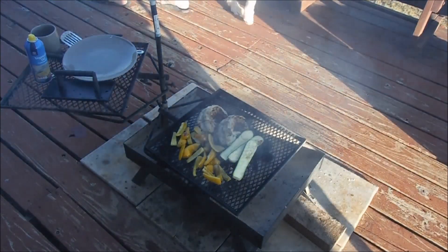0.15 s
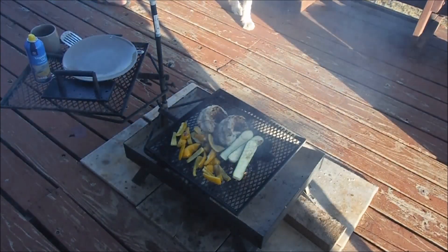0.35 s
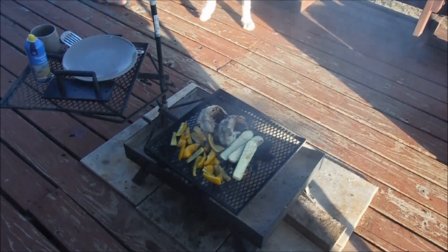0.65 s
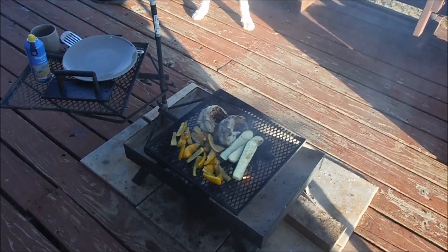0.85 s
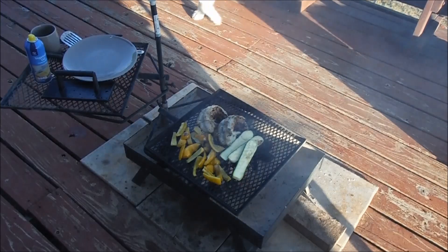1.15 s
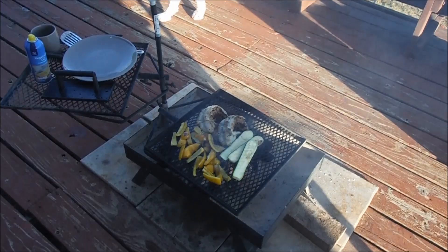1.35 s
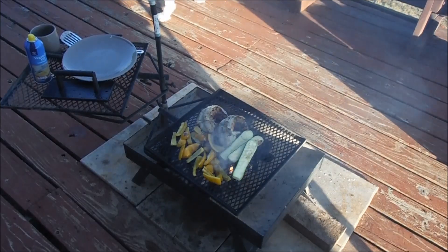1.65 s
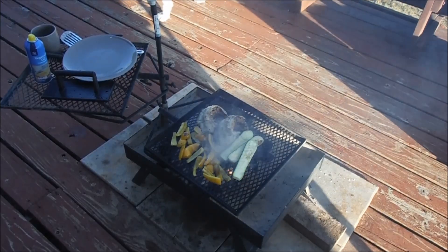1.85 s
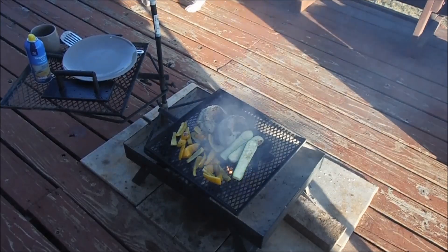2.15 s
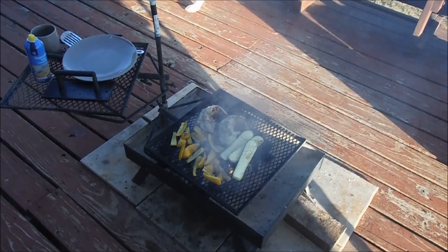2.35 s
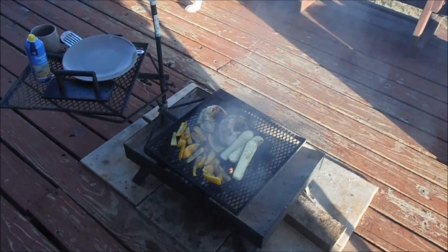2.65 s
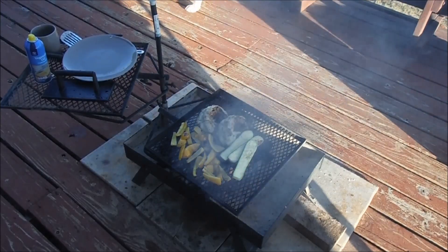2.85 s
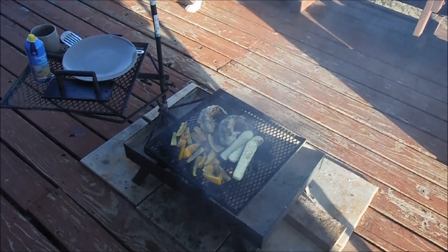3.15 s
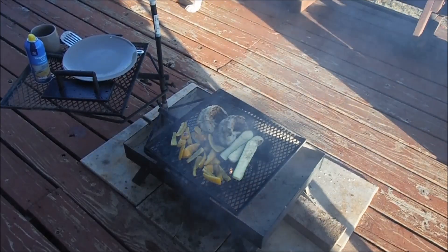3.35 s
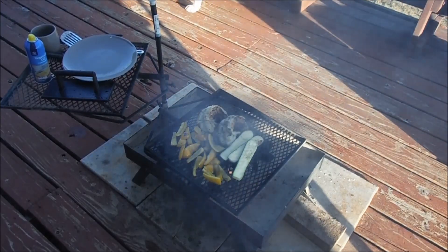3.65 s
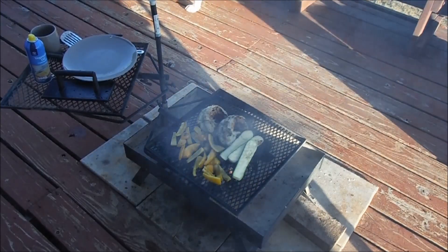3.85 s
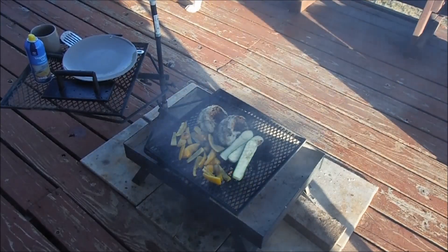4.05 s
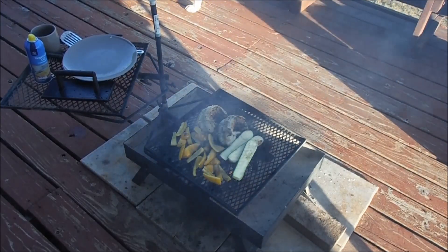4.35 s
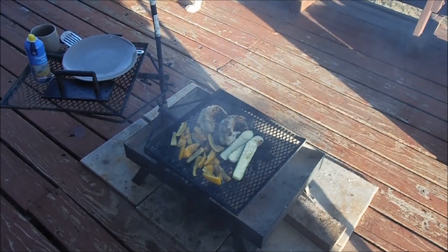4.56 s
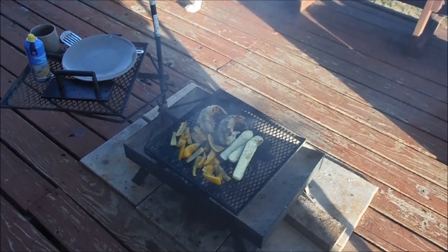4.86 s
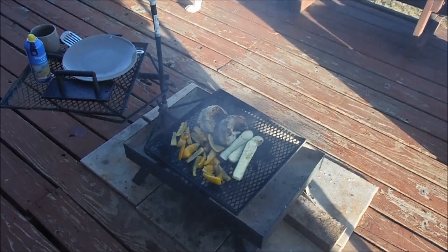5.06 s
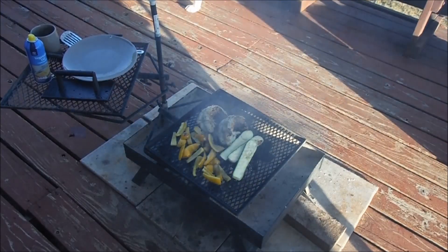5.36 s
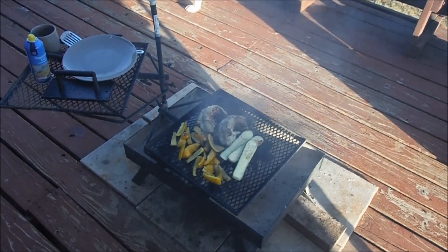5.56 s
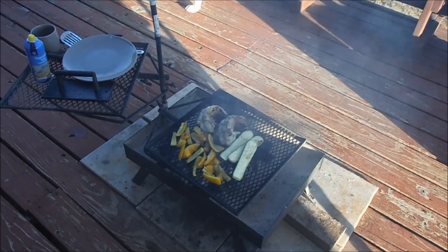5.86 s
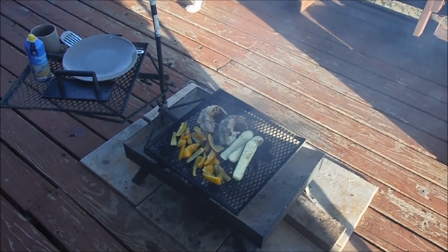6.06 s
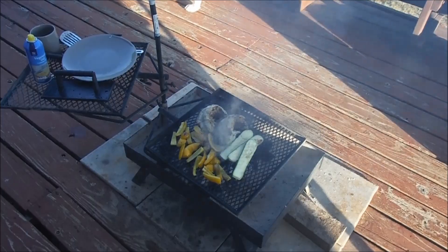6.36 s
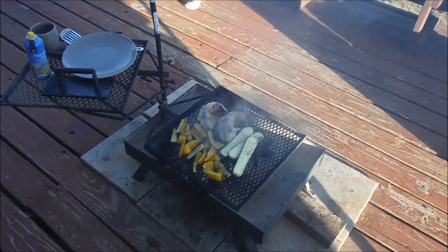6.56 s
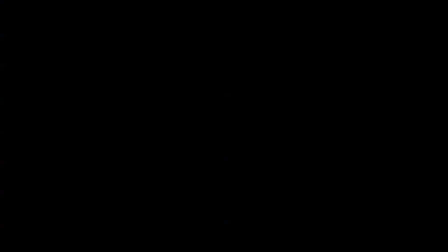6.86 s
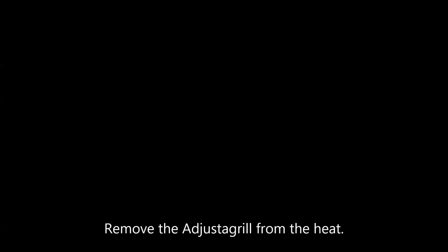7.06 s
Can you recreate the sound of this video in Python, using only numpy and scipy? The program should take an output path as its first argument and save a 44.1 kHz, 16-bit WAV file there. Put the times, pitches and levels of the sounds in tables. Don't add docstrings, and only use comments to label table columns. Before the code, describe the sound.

Outdoors on a wooden deck, food sizzles close to the microphone from 0 seconds: a bright, fine, flickering hiss of bursting steam bubbles, over faint low mains hum, soft open air and far rumble. Crisp fat spits pepper it, dense in the first half second, with clear pops near 1.0 and 3.35. Dog claws tick lightly around 0.8-1.0; paws scuff softly, busier at 2.2-2.6, and a quick, harder step lands at 2.9-3.0. The frying swells slightly around 1.2-1.5, dips near 2.5 and weakens by 5.4. At 5.8 a small click begins the handling; a sharp grab cracks at 5.9, followed by finger rubs. Deep grip rumble swells at 6.3, the hardest distorted crack hits at 6.43, and another heavy jolt comes at 6.58. The sizzle drops lower beneath. A loose part taps softly at 6.6-6.77, then everything stops dead at 6.9.

```python
import sys
import numpy as np
from scipy import signal
from scipy.fft import rfft, irfft, next_fast_len
from scipy.io import wavfile
from scipy.ndimage import uniform_filter1d

SR = 44100
rng = np.random.default_rng(int(sys.argv[2]) if len(sys.argv) > 2 else 0)


def ratio_of_db(decibels):
    return 10 ** (np.asarray(decibels, float) / 20)


def wav_out(sig):
    wavfile.write(sys.argv[1], SR, np.round(np.clip(np.atleast_2d(sig).T, -1, 1) * 32767).astype(np.int16))


N = 318402
T = np.arange(N) / SR


def band(x, hz, width):
    low = max(np.sqrt(hz ** 2 + width ** 2 / 4) - width / 2, 10)
    high = min(low + width, 0.45 * SR)
    return signal.sosfilt(signal.butter(2, [low, high], "bandpass", fs=SR, output="sos"), x)


def unit(x):
    return x / np.sqrt(np.mean(x ** 2))


def walk(rate):
    hold = int(SR / rate)
    levels = np.repeat(rng.standard_normal(N // hold + 1), hold)
    return unit(uniform_filter1d(uniform_filter1d(levels, hold), hold)[:N])


def add(out, s, x):
    i = int(s * SR)
    out[i:i + len(x)] += x[:N - i]


def decay(t, t60):
    return 1000 ** (-t / t60)


def bed(source, colour, lo, hi, flicker_db, rate):
    size = next_fast_len(N)
    f = np.maximum(np.fft.rfftfreq(size, 1 / SR), 1)
    hz, db = np.transpose(colour)
    tinted = rfft(source, size) * ratio_of_db(np.interp(np.log(f), np.log(hz), db))
    inside = (f > lo) & (f < hi)
    tinted /= np.sqrt(np.mean(irfft(tinted * inside, size) ** 2))
    thirds = 3 * np.log2(f)
    first, last = int(3 * np.log2(hz[0])) - 1, int(3 * np.log2(hz[-1])) + 1
    out = np.zeros(N)
    for k in range(first, last + 1):
        share = np.cos(np.pi / 2 * np.clip(thirds - k, -1, 1)) ** 2
        out += irfft(tinted * share, size)[:N] * ratio_of_db(flicker_db * walk(rate))
    return out


def hits(table, spread, low_hz, low_width, low_stretch, tick):
    out, t = np.zeros(N), T[:SR // 6]
    for s, db, hz, low_db, t60 in table:
        high, low = rng.standard_normal((2, len(t)))
        t60 = max(t60, 0.002)
        high *= decay(t, t60)
        low *= decay(t, t60 * low_stretch)
        high[0], low[0] = tick, tick
        high = band(high, hz, spread * hz)
        low = band(low, low_hz, low_width)
        add(out, s, ratio_of_db(db) * (high / abs(high).max() + ratio_of_db(low_db) * low / abs(low).max()))
    return out


def strokes(table):
    out = np.zeros(N)
    grit_db = 2.5
    for s, length, db, hz, width in table:
        u = np.arange(int(length * SR)) / (length * SR)
        noise, grit = rng.standard_normal((2, SR // 2))
        grit = ratio_of_db(grit_db * unit(uniform_filter1d(grit, size=90)))
        x = unit(band(noise * grit, hz, width))[:len(u)]
        swell, fade = np.minimum(u / 0.1, 1), np.minimum((1 - u) / 0.49, 1)
        add(out, s, ratio_of_db(db) * x * swell * fade)
    return out


# (time [s], sizzle level [dB])
FRYING_HEAT = [(0.0, -51.5), (0.57, -53), (0.98, -51.5), (1.18, -49.5), (1.49, -49.5), (2.48, -55),
               (2.59, -55), (4.11, -53), (5.4, -57.5), (5.64, -56), (5.75, -54)]


def heat():
    return np.interp(T, *np.transpose(FRYING_HEAT))


# (frequency [Hz], density [dB per Hz])
AIR_COLOUR = [(12, -22), (20, 2.5), (75, -0.5), (118, -4.5), (139, -3.5), (168, -3.5), (412, -11),
              (947, -15), (1250, -13), (1610, -19), (2080, -16.5), (2740, -23.5), (3880, -25.5),
              (4350, -27.5), (5000, -20), (6500, -29.5), (11000, -120)]


def air():
    air_db, follows_heat = -58.5, 0.22
    level = air_db + follows_heat * (heat() - heat().mean())
    return bed(rng.standard_normal(N), AIR_COLOUR, 300, 2500, 1.5, 2.5) * ratio_of_db(level)


# (frequency [Hz], level [dB])
MAINS = [(60, -67), (120, -56)]


def hum():
    seconds = np.cumsum(1 + 0.0025 * walk(4)) / SR
    out, wobble_db = np.zeros(N), 1.0
    for hz, db in MAINS:
        out += np.sqrt(2) * ratio_of_db(db + wobble_db * walk(8.9)) * np.sin(2 * np.pi * hz * seconds)
    return out


# (time [s], peak level [dB], centre [Hz], board thud level [dB], t60 [s])
CLAW_TAPS = [
    (0.77, -50.5, 2270, -9, .05),
    (1.036, -42, 3500, -9, 0.0054),
    (2.43, -44, 2260, -17, 0.034),
    (2.431, -43, 1050, -20, 0.069),
    (2.58, -59, 520, 7.5, 0.062),
    (2.65, -48.5, 1330, 0.5, .05),
    (2.911, -43.5, 1650, -3, 0.11),
    (2.964, -33, 1740, -8, 0.093),
    (6.507, -41.5, 1700, 5.5, 0.0051),
    (6.5175, -54, 1200, -3.5, 0.0047),
]


def claws():
    return hits(CLAW_TAPS, 0.66, 283, 500, 2.37, 2.4) * ratio_of_db(7.5)


# (time [s], length [s], level [dB], centre [Hz], width [Hz])
PAW_SCUFFS = [(1.014, 0.12, -47, 7500, 4500), (1.252, 0.28, -59.5, 3000, 3000),
              (1.594, 0.17, -54, 2080, 1490), (1.602, 0.15, -51.5, 5630, 3500),
              (2.023, 0.12, -56.5, 2500, 4000), (2.231, 0.073, -44, 1080, 1296),
              (2.242, 0.089, -50, 447, 440), (2.245, 0.089, -44.5, 4500, 7000),
              (2.25, 0.034, -40, 2250, 2190), (2.28, 0.072, -47.5, 1990, 3000),
              (2.294, 0.036, -42.5, 1210, 700), (2.433, 0.023, -54, 8500, 1500),
              (2.914, 0.015, -45.5, 7500, 6000), (2.961, 0.016, -37.5, 6700, 7800),
              (2.966, 0.031, -43.5, 5000, 5600), (4.898, 0.26, -63, 3630, 2000),
              (5.559, 0.27, -65, 3750, 1111), (3.9, 0.38, -59, 13000, 5000),
              (5.575, 0.18, -59, 12500, 6000)]


def scuffs():
    return strokes(PAW_SCUFFS)


# (time [s], length [s], level [dB], centre [Hz])
FINGER_RUBS = [(5.802, 0.078, -51.5, 3000), (5.916, 0.089, -42.5, 4910), (5.976, 0.068, -39, 5200),
               (5.98, .05, -47, 1800), (6.001, 0.043, -52, 350), (6.026, 0.027, -43.5, 1290),
               (6.03, 0.15, -45.5, 4500), (6.086, 0.028, -47, 1150), (6.095, 0.024, -48, 7800),
               (6.176, 0.048, -47, 2980), (6.203, 0.019, -39, 3300), (6.2, 0.02, -46, 1150),
               (6.248, 0.012, -50, 3000), (6.258, 0.078, -44.5, 394), (6.272, 0.16, -56, 992),
               (6.317, 0.087, -43.5, 446), (6.445, 0.049, -30.5, 7030), (6.449, 0.053, -47, 13120),
               (6.45, 0.053, -36, 3000), (6.46, 0.033, -28, 700), (6.465, 0.01, -31.5, 2530),
               (6.551, 0.026, -56.5, 6030), (6.554, 0.056, -44, 394), (6.59, 0.033, -28, 807),
               (6.593, 0.016, -44.5, 2454), (6.599, 0.029, -29.5, 3950), (6.603, 0.027, -53, 9970),
               (6.608, 0.029, -43.5, 3015)]


def rubs():
    widest_hz = 4500
    return strokes([(*row, min(1.6 * row[-1], widest_hz)) for row in FINGER_RUBS])


# (time [s], level [dB])
GRIP_RUMBLE = [
    (5.88, -64),
    (5.93, -43),
    (6.04, -40),
    (6.1, -45.5),
    (6.23, -38.5),
    (6.34, -21.5),
    (6.405, -33),
    (6.49, -23.5),
    (6.536, -54),
]
# (time [s], level [dB])
REGRIP_RUMBLE = [
    (6.57, -24),
    (6.601, -27),
    (6.619, -39),
]


def grip():
    s, db = np.transpose([*GRIP_RUMBLE, *REGRIP_RUMBLE])
    rumble = band(rng.standard_normal(N), 32, 200)
    rumble = unit(signal.lfilter([1], [1, -0.985], rumble))
    return rumble * ratio_of_db(np.interp(T, s, db, -120, -120) + 3.8 * walk(60))


# (time [s], push [full scale, negative = pull], half width [s], rebound [full scale])
MEMBRANE_JOLTS = [(5.8105, -.04, .001, .01), (5.91615, -2.0, .0003, 0), (5.9167, -.5, .0004, .27),
                  (6.032, -.04, .003, .02), (6.333, .2, .003, -.15), (6.382, .13, .008, 0),
                  (6.409, .22, .0008, -.1), (6.4279, 1.05, .0009, -.5), (6.4492, .25, .001, -.08),
                  (6.4663, -.85, .0006, .12), (6.5535, -.13, .001, .1), (6.575, .33, .008, 0),
                  (6.5838, -1.8, .001, .6), (6.599, -.3, .005, 0), (6.6025, .2, .0006, 0),
                  (6.6065, -.7, .004, -.4), (6.6192, .42, .0007, 0)]


def jolts():
    out, settle_s = np.zeros(N), 0.007
    for s, push, half, rebound in MEMBRANE_JOLTS:
        after = np.maximum(T - s - half / 2, 0)
        out += push * np.exp(-((T - s) / half) ** 2)
        out += rebound * (1 - np.exp(-(after / half) ** 2)) * np.exp(-after / settle_s)
    return out


# (time [s], peak level [dB])
LOOSE_TAPS = [
    (6.624, -30),
    (6.695, -39.5),
    (6.766, -46),
]
# (frequency [Hz], level [dB], t60 [s])
CASING_MODES = [(461, 3, 0.072), (716, 4.5, 0.037), (1020, -18, 0.091), (1223, -7, 0.05)]


def rattles():
    out, t = np.zeros(N), T[:SR // 4]
    for s, db in LOOSE_TAPS:
        ring = np.zeros(len(t))
        for hz, mode_db, t60 in CASING_MODES:
            level = ratio_of_db(mode_db + 2.0 * rng.standard_normal())
            ring += level * np.sin(2 * np.pi * hz * t) * decay(t, t60)
        add(out, s, ratio_of_db(db) * ring * np.minimum(t / 0.01, 1))
    return out


# (time [s], peak level [dB], centre [Hz], low part level [dB], t60 [s])
BUTTON_TICKS = [(5.81, -32, 8000, -21, 0.0066), (5.9045, -15.5, 7900, -14, 0.0064),
                (5.9065, -23, 7500, -20, .005), (5.908, -35, 8500, -18, .005),
                (5.9105, -27, 6400, -12, 0.0084), (5.937, -36, 6000, -20, .006),
                (6.349, -29, 5800, -4, .006), (6.033, -36, 4000, -2, 0.0069),
                (6.553, -43, 7300, -0.5, 0.0068), (6.57, -40, 4280, -9.5, .005),
                (6.585, -13, 3000, -28, 0.011)]


def ticks():
    return hits(BUTTON_TICKS, 0.3, 2600, 2500, 2.1, 6.7)


# (time [s], peak level [dB], centre [Hz], low part level [dB], t60 [s])
CASING_CRACKS = [
    (5.9157, -9, 5000, -6, .006),
    (6.4085, -14, 6500, -8, .007),
    (6.427, -14, 5000, -8, .008),
    (6.4284, -5, 6000, -9, .009),
    (6.4485, -15, 8000, -4, .007),
    (6.5836, -15, 5000, -6, .006),
    (6.6158, -16, 5000, -8, .014),
]


def cracks():
    return hits(CASING_CRACKS, 1.6, 1700, 2600, 1.2, 2.5)


# (time [s], peak level [dB], treble loss [dB per kHz])
SHELL_KNOCKS = [
    (5.9163, -17, 1.6),
    (6.4088, -26, .2),
    (6.4286, -12, .6),
    (6.5845, -19, 2.6),
    (6.6161, -25, .3),
]
# (frequency [Hz], level [dB], t60 [s])
SHELL_MODES = [(1250, -2, .012), (2070, 1, .011), (3060, 0, .014), (3660, 0, .011), (5100, 1, .009),
               (5900, -2, .007), (6700, -2, .007), (7700, -1, .007), (8700, -2, .006)]


def shell():
    out, t = np.zeros(N), T[:SR // 20]
    for s, db, loss_db in SHELL_KNOCKS:
        ring = np.zeros(len(t))
        for hz, mode_db, t60 in SHELL_MODES:
            a, b = rng.standard_normal(2)
            level = ratio_of_db(db + mode_db - loss_db * hz / 1000 + 1.5 * a)
            tone = np.sin(2 * np.pi * hz * (1 + 0.02 * b) * t) * np.sign(b)
            ring += level * tone * decay(t, t60)
        add(out, s, ring)
    return out


# (frequency [Hz], density [dB per Hz])
SIZZLE_COLOUR = [(880, -35.5), (1500, 1.5), (1660, 0), (2060, 5.5), (2730, 0), (3830, 6), (4320, 2.5),
                 (7050, 13), (8690, 13), (12600, 2), (15000, 0.5), (15800, 0), (16300, -12)]


def sizzle():
    burst = rng.random(N) < 1800 / SR
    sizes = ratio_of_db(3.2 * np.minimum(rng.exponential(size=N), 4.5)) * rng.standard_normal(N)
    source = unit(burst * sizes) * 0.8 + rng.standard_normal(N)
    hiss = bed(source, SIZZLE_COLOUR, 5000, 10500, 0.9, 12) * ratio_of_db(0.6 * walk(25))
    body = signal.sosfiltfilt(signal.butter(4, 11000, fs=SR, output="sos"), hiss)
    fine_spray = unit(hiss - body) * ratio_of_db(-9)
    return (body + fine_spray) * ratio_of_db(heat())


# (time [s], peak level [dB], centre [Hz], low part level [dB])
FAT_SPITS = [(0.05, -27, 7000, -23), (0.086, -31, 6990, -13), (0.109, -32, 7050, -25),
             (0.1384, -26, 7200, -15), (0.2187, -31, 7200, -13), (0.233, -31, 7360, -24),
             (0.4218, -32, 7860, -25), (0.4508, -26.5, 7700, -17), (0.5636, -27.5, 7360, -16),
             (0.7701, -34, 7950, -16), (0.9576, -35, 7600, -8), (1.035, -25, 6350, -5.5),
             (1.0877, -31, 6500, -16), (1.43, -38, 8060, -6), (1.6614, -32, 7810, -17),
             (1.995, -36, 7240, -12), (2.2528, -35, 5820, -10), (2.9112, -38.5, 7900, 6.5),
             (2.964, -23.5, 5460, -24), (3.2121, -31.5, 7500, -13), (3.245, -32, 7320, -15),
             (3.3527, -24, 8040, -20), (3.6563, -33, 7800, -26), (3.853, -34, 7660, -29),
             (4.0501, -38, 8510, -27), (4.103, -28.5, 8400, -36), (4.248, -36, 7850, -19),
             (4.309, -31.5, 8500, -30), (4.6022, -34, 8860, -9), (5.358, -36, 8360, -19)]


def spits():
    count, until_s, t60 = 40, 5.8, 0.013
    rows = [(*row, t60) for row in FAT_SPITS]
    for _ in range(count):
        s = until_s * rng.random()
        a, b = rng.standard_normal(2)
        rows.append((s, -40.5 + 3 * a, 7600 * (1 + 0.096 * b), -21, t60))
    return hits(rows, 0.49, 1950, 3100, 2.6, 3.96)


def duck():
    start_s, attack_s, drop_db, recover_db_per_s = 6.42, 0.17, -9, 4
    late = np.maximum(T - start_s, 0)
    drop = drop_db * np.minimum(late / attack_s, 1)
    return ratio_of_db(drop + recover_db_per_s * np.maximum(late - attack_s, 0))


def scene():
    steady = (air() + hum() + sizzle()) * duck()
    dog = claws() + scuffs()
    hand = rubs() + grip() + jolts() + rattles() + ticks() + cracks() + shell()
    return (steady + dog + hand + spits())[None]


def band_limit(x):
    return signal.sosfilt(signal.butter(12, 16680, fs=SR, output="sos"), x)


def record(dry):
    low_hz, top_hz, clip, end_s = 3, 15600, 0.98, 6.9
    x = signal.lfilter(*signal.butter(1, low_hz, "highpass", fs=SR), dry)
    x = signal.sosfilt(signal.ellip(8, 0.2, 60, top_hz, fs=SR, output="sos"), x)
    x = np.clip(x, -clip, clip)
    mix = x * np.clip((end_s - T) / 0.0041, 0, 1)
    return band_limit(mix)


dry = scene()
out = record(dry)
wav_out(out)
```